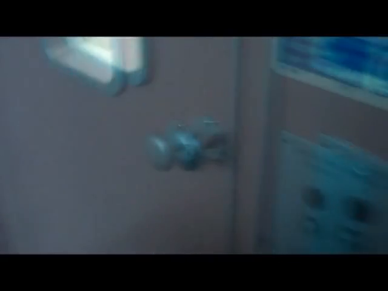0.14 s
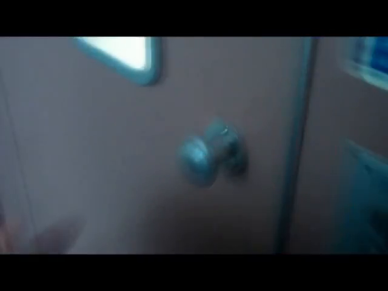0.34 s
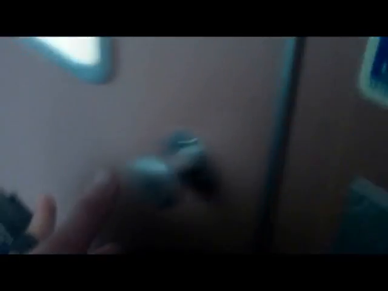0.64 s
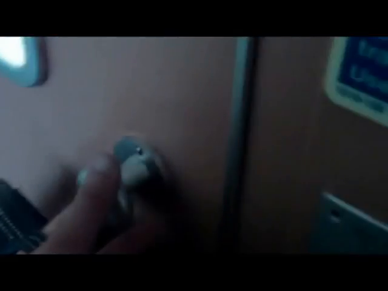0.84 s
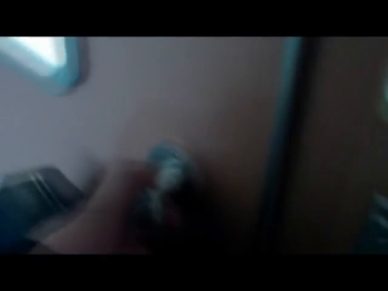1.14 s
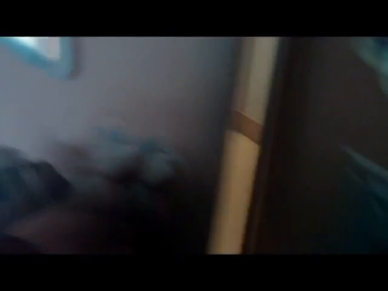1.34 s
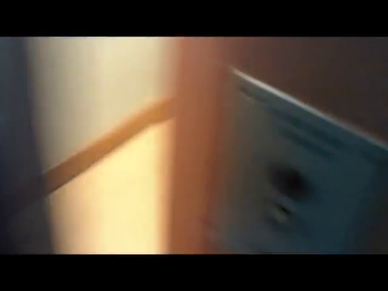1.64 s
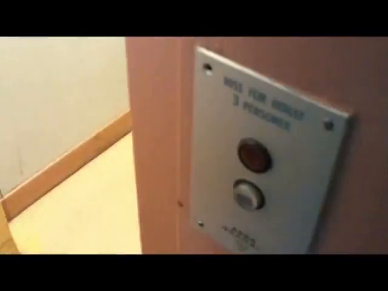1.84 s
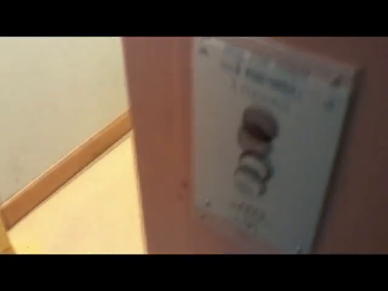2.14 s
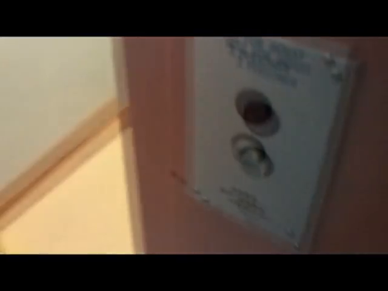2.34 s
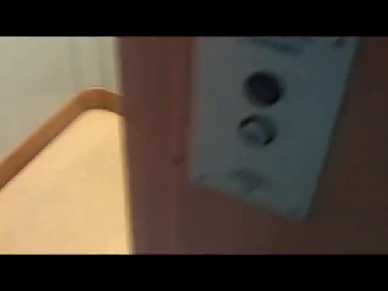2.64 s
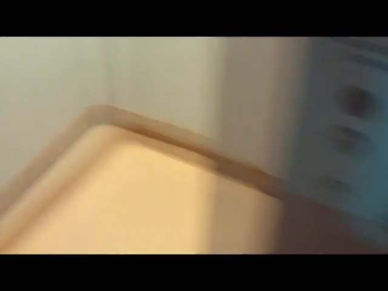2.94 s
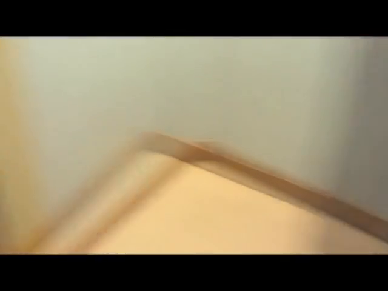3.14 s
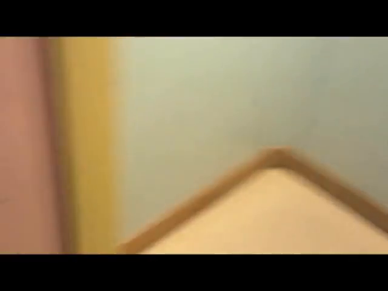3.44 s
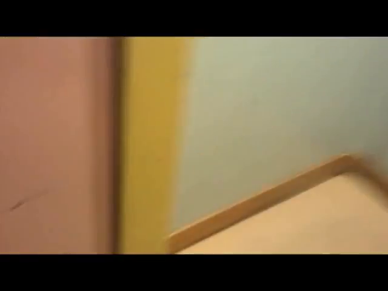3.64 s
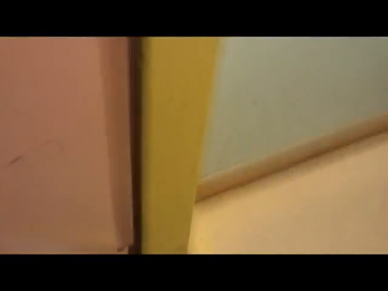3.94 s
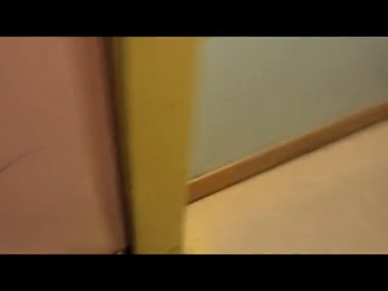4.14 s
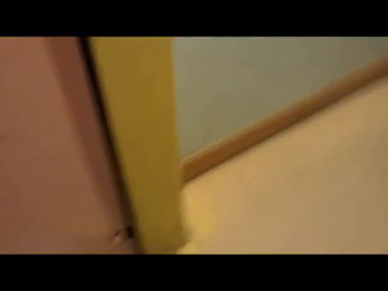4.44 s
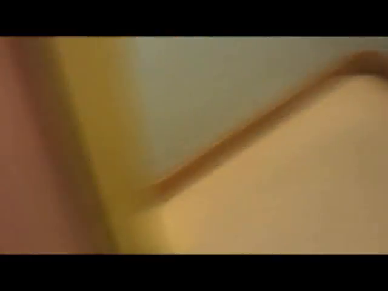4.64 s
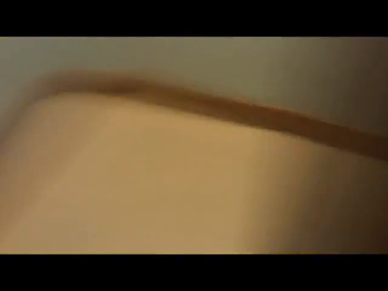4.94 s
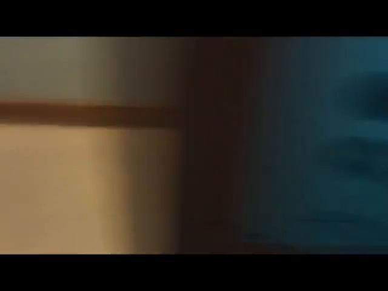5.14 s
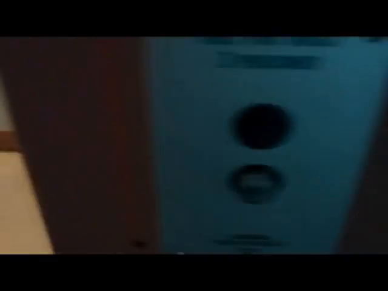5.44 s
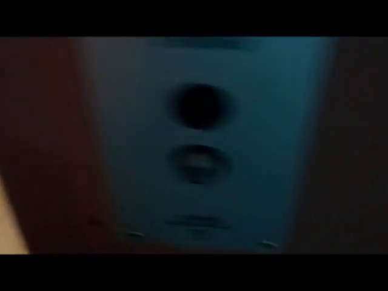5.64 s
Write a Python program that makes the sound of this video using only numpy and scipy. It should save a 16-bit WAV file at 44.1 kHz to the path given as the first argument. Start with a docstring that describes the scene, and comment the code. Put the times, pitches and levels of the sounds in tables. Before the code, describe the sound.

An old lift hums steadily while its steel door is pulled open, then an inner door slides, clanks and bangs shut with a deep boom.

```python
"""An old lift hums on its landing, as overtones of one tone over shaped noise, and a small camera hisses.
The camera's case ticks in the grip: slipping plastic gives noise cracks and very short damped modes.
A hand turns the knob and pulls the steel door open: blows excite rattles, modes and a diffuse echo.
The inner door knocks, rubs, clanks on its catch and bangs against the car, which booms on its ropes.
Loud blows overload the one microphone, which flattens their peaks."""
import sys
import numpy as np
from scipy import signal
from scipy.fft import rfft, irfft
from scipy.io import wavfile

SR = 44100
rng = np.random.default_rng(int(sys.argv[2]) if len(sys.argv) > 2 else 0)


def waveform_to_disk(signal):
    """Save audio, clipped to [-1, 1], as 16-bit WAV at the path in sys.argv[1]."""
    frames = np.transpose(np.atleast_2d(signal))
    scaled = np.clip(frames, -1, 1) * 32767
    samples = np.round(scaled).astype(np.int16)
    wavfile.write(sys.argv[1], SR, samples)


N = 254456
TIME = np.arange(N) / SR
RING_TIME = TIME[:65536]  # span of one blow, about 1.5 s

# Levels are relative: each source's own gain follows. A t60 is the time of a 60 dB decay.
# Blows of the inner door on the car. Each row: start in seconds, level in dB, rattle t60 in seconds.
CAR_BLOWS = [(4.053, -10.5, 0.094), (4.224, -25, 0.11), (4.746, -32.5, 0.15)]


def amp(db):
    """The decibel is logarithmic: 20 dB is a tenfold amplitude."""
    return 10 ** (np.asarray(db) / 20)


def unit(x):
    """Root-mean-square normalisation: equal mean power for every signal."""
    return x / np.sqrt(np.mean(x ** 2) + 1e-20)


def read(points, hz):
    """Interpolation on a logarithmic frequency axis, as pitch is heard."""
    f, value = np.transpose(points)
    return np.interp(np.log(hz + 1), np.log(f + 1), value)


def level(points):
    """A gain envelope whose level moves linearly in decibels between rows of (s, dB)."""
    return amp(np.interp(TIME, *np.transpose(points)))


def fade(t, t60):
    """Exponential decay: linear damping loses 60 dB in every t60."""
    return np.exp(-np.log(1000) * t / np.maximum(t60, 1e-4))


def stroke(t, rise, hold, t60):
    """A driven motion: linear run-up, steady hold, then exponential decay."""
    run_up = np.clip(t / max(rise, 1e-4), 0, 1)
    return run_up * fade(np.maximum(t - rise - hold, 0), t60)


def add(mix, s, sound):
    """Linear superposition of a sound from time s onward."""
    part = mix[max(round(s * SR), 0):][:len(sound)]
    part += sound[:len(part)]


def noise(colour, size):
    """Filtered white noise: a random source of rms 1 with a prescribed spectrum."""
    hz = np.fft.rfftfreq(size, 1 / SR)
    white = rng.standard_normal(size)
    return unit(irfft(rfft(white) * amp(read(colour, hz)), size))


def drift(per_s):
    """Slow random modulation of rms 1, interpolated between chance values."""
    knots = np.arange(0, TIME[-1] + 1, 1 / per_s)
    return unit(np.interp(TIME, knots, rng.standard_normal(len(knots))))


def low_pass(x, edge_hz):
    """Band limiting by convolution with a windowed sinc."""
    taps = signal.firwin(255, edge_hz, window=("kaiser", 9), fs=SR)
    return signal.oaconvolve(x, taps, "same")


def ring(modes, detune, hold=0):
    """Modal superposition: damped sines, slightly retuned each time, decay once the drive lets go."""
    free = np.maximum(RING_TIME - hold, 0)
    total = np.zeros(len(RING_TIME))
    for k, (hz, db, t60) in enumerate(modes):
        shifted_hz = hz * (1 + detune * rng.uniform(-0.82, 1))
        sine = np.sin(2 * np.pi * shifted_hz * RING_TIME)
        total += (-1) ** k * amp(db) * fade(free, t60) * sine  # neighbours start in opposite sign
    return np.sqrt(2) * total


def echo(colour):
    """Diffuse reverberation: each frequency band of a noise decays at the landing's own rate."""
    # The landing. Each row: frequency in Hz, t60 in seconds.
    room_decay = [(40, 3.1), (200, 1.06), (800, 0.85), (2000, 0.57), (7000, 0.62)]
    hz, t, bands = signal.stft(noise(colour, size=len(RING_TIME)), SR, nperseg=1024)
    decaying = bands * fade(t, read(room_decay, hz)[:, None])
    return signal.istft(decaying, SR)[1][:len(RING_TIME)]


def struck(blows, colour, modes, rise_s, ring_db, room_db):
    """Impact excitation: a blow sets off a dense rattle, discrete modes and the landing's echo."""
    out, t = np.zeros(N), RING_TIME
    for s, db, t60 in blows:
        shape = fade(t, t60)
        rattle = unit(noise(colour, size=len(t)) * shape) * np.sqrt(np.mean(shape ** 2))
        ringing = amp(ring_db) * ring(modes, detune=.003)
        sound = rattle + ringing + amp(room_db) * echo(colour)
        attack = np.minimum(t / max(rise_s, 1e-4), 1)
        add(out, s, amp(db) * attack * sound)
    return out


def friction(pushes, colour, slips_per_s, uneven_db):
    """Friction or flow noise: amplitude follows speed, set by the strongest push, with random unevenness."""
    strokes = [amp(db) * stroke(TIME - s, rise, hold, t60) for s, db, rise, hold, t60 in pushes]
    speed = np.max(strokes, axis=0)
    return speed * unit(noise(colour, size=N) * amp(uneven_db * drift(slips_per_s)))


def machine(waver, hum_db, wash_db, swell_db):
    """Harmonic synthesis: a slightly unsteady mains hum and overtones, over noise from the shaft."""
    # Hum changing as the camera moves through its standing waves. Each row: time in seconds, level in dB.
    hum_level = [(0.08, -43), (1.59, -39), (1.71, -44), (3.04, -47.5), (3.29, -39), (3.44, -60), (3.6, -49),
                 (4.4, -40), (4.776, -47.5), (4.982, -67), (5.16, -42), (5.7, -41.5)]
    # Overtones of the hum. Each row: multiple of the lowest tone, level in dB.
    hum_orders = [(1, 1), (2, -23), (3, -25.5), (4, -30.5)]
    # Machine noise in the shaft. Each row: frequency in Hz, density in dB per Hz.
    shaft_colour = [(20, -16.5), (50, -3.5), (85, -7.5), (125, -2), (170, -7), (290, -4.5), (370, -10.5),
                    (600, -12), (950, -11.5), (1300, -18.5), (2500, -25), (6000, -29.5)]
    # The wash swells as the outer door opens. Each row: time in seconds, level in dB.
    shaft_level = [(0.05, -39.5), (0.82, -42), (1.34, -35), (2.4, -41.5), (2.7, -42), (5.1, -40),
                   (5.7, -41.5)]
    turns = 120.8 * TIME + waver * drift(5)  # cycles of a tone centred on 120.8 Hz
    hum = np.sqrt(2) * sum(amp(db) * np.cos(2 * np.pi * round(k) * turns) for k, db in hum_orders)
    wash = noise(shaft_colour, size=N) * amp(swell_db * drift(14))
    return amp(hum_db) * hum * level(hum_level) + amp(wash_db) * wash * level(shaft_level)


def microphone_hiss(gain_db):
    """Stationary coloured noise under a slowly varying gain."""
    # Each row: frequency in Hz, density in dB per Hz.
    hiss_colour = [(100, -7.5), (1500, 1.5), (3500, -0.5), (6000, 0.5), (7200, -7)]
    # Each row: time in seconds, level in dB.
    hiss_level = [(0.0, -42), (2.76, -43), (4.06, -42), (5.05, -45.5), (5.77, -45)]
    return amp(gain_db) * level(hiss_level) * noise(hiss_colour, size=N)


def draught():
    """Flow noise: the outer door drags air past the microphone in a low rumble."""
    # Each row: start in seconds, level in dB, run-up in seconds, hold in seconds, coasting t60 in seconds.
    draught_pushes = [(1.1, -41, .2, 0.34, 2.8)]
    # Each row: frequency in Hz, density in dB per Hz.
    draught_colour = [(25, -3), (50, 0), (90, -9), (300, -15), (600, -35), (7000, -60)]
    return friction(draught_pushes, draught_colour, slips_per_s=15, uneven_db=2.5)


def scuffs(skirt_db):
    """Soft friction of sleeve and hand: bands of noise that swell and fade."""
    # Each row: middle in seconds, level in dB, length in seconds, centre frequency in Hz.
    scuff_rows = [(0.135, -31.5, .025, 1460), (1.689, -33.5, 0.15, 735), (2.065, -39, 0.035, 1570),
                  (2.43, -37.5, 0.064, 550), (2.954, -43, 0.29, 1900), (4.718, -25, .008, 706),
                  (4.74, -28.5, .03, 2270), (4.848, -38, 0.092, 2260), (5.353, -40.5, 0.075, 1800)]
    out = np.zeros(N)
    for s, db, length, hz in scuff_rows:
        swell = signal.windows.hann(round(length * SR))
        colour = [(hz / 8, 2 * skirt_db), (hz, 0), (hz * 8, 2 * skirt_db)]
        add(out, s - length / 2, amp(db) * swell * noise(colour, size=len(swell)))
    return out


def case_ticks():
    """Stick-slip near the microphone: a dry crack, a hollow knock and shell modes, brighter if harder."""
    # Each row: start in seconds, level in dB, slipping time in seconds,
    # hardness in dB per octave, hollow knock in dB.
    ticks = [(.149, -15, 0.0058, 1.5, -16), (.2, -31.5, 0.00041, -18, -14), (1.54, -28.5, 0.0027, -17, -13),
             (2.15, -19.5, 0.00062, 4, -2), (2.1754, -14, 0.0041, 5.5, -6.5),
             (2.2163, -24.5, 0.00031, -13, -12), (4.507, -21.5, 0.00034, 1, -21),
             (4.595, -8, 0.00045, 2.5, -14.5), (4.722, -9.5, .0005, 4, -13),
             (4.9185, -10, .0005, -3, -12.5)]
    # Shell of the case. Each row: frequency in Hz, level in dB, t60 in seconds.
    case_modes = [(1045, -5.5, 0.024), (1417, -18, 0.074), (1886, -6.5, 0.016), (2361, -8, 0.016),
                  (2996, -10, 0.014), (4202, -19, 0.014)]
    # Hollow of the case. Each row: frequency in Hz, level in dB, t60 in seconds.
    hollow_modes = [(394, -1, .028), (597, 0, 0.02)]
    # Dry crack. Each row: frequency in Hz, density in dB per Hz.
    crack_colour = [(100, -21), (600, 5.5), (1100, 11.5), (2500, 7.5), (3500, -3.5), (4800, 0.5),
                    (6000, 6.5), (7200, -15.5)]
    out, t = np.zeros(N), RING_TIME
    for s, db, slip_s, hardness, knock_db in ticks:
        crack_gain = amp(1.5 + .2 * hardness)  # a harder slip cracks louder
        slipping = stroke(t, 0, slip_s, t60=0.015)
        crack = crack_gain * noise(crack_colour, size=len(t)) * slipping
        knock = amp(knock_db) * ring(hollow_modes, detune=0.041)
        # hardness tilts the shell's spectrum about 1400 Hz
        shell = [(hz, mode_db + hardness * np.log2(hz / 1400), t60) for hz, mode_db, t60 in case_modes]
        add(out, s, amp(db) * (ring(shell, detune=0.063, hold=slip_s) + crack + knock))
    return out


def rubbing_doors():
    """Sliding friction: each push speeds a door up, then it coasts and its rubbing dies away."""
    # Each row: start in seconds, level in dB, run-up in seconds, hold in seconds, coasting t60 in seconds.
    door_pushes = [(1.13, -29.5, 0.068, .01, 0.58), (1.27, -33, 0.038, .02, 1.14),
                   (2.8, -38, .2, 0.11, 3.5), (3.3, -32.5, 0.028, 0.021, 3.1), (3.85, -34, .1, 0.18, 3.8),
                   (4.44, -33, 0.086, 0.049, .6)]
    # Each row: frequency in Hz, density in dB per Hz.
    rub_colour = [(30, -1), (90, -1.5), (300, 1), (450, -4.5), (800, 1), (1300, -4), (2200, -9.5),
                  (3200, -12), (7000, -16.5)]
    return friction(door_pushes, rub_colour, slips_per_s=120, uneven_db=2.0)


def sliding_door():
    """Sliding friction: the inner door runs fast on its track just before it bangs."""
    # Each row: start in seconds, level in dB, run-up in seconds, hold in seconds, coasting t60 in seconds.
    slide_pushes = [(3.96, -23.5, 0.026, 0.066, 0.78)]
    # Each row: frequency in Hz, density in dB per Hz.
    slide_colour = [(100, -18), (300, -5.5), (500, -3), (750, -3), (1000, -4), (1300, -15), (1900, -22),
                    (2600, -32), (7000, -45)]
    return friction(slide_pushes, slide_colour, slips_per_s=290, uneven_db=0.9)


def catch_scrape():
    """Friction of steel on steel at the catch: noise in narrow treble bands."""
    # Each row: start in seconds, level in dB, run-up in seconds, hold in seconds, coasting t60 in seconds.
    scrape_pushes = [(3.782, -21.5, 0.027, 0.0044, 0.13)]
    # Each row: frequency in Hz, density in dB per Hz.
    scrape_colour = [(2500, -39), (4500, -18), (5050, 3.5), (5250, -17), (5500, 4), (5800, 2), (6090, -15),
                     (7000, -7.5)]
    return friction(scrape_pushes, scrape_colour, slips_per_s=200, uneven_db=-1.0)


def catch_pings():
    """Free vibration of small steel: the catch rings brightly for a moment."""
    # Each row: start in seconds, level in dB.
    ping_rows = [(3.564, -30.5), (3.783, -33)]
    # Each row: frequency in Hz, level in dB, t60 in seconds.
    ping_modes = [(560, -1.5, 0.097), (1700, -11, 0.11), (3040, -4, 0.12), (3120, -4.5, 0.1),
                  (4770, -5.5, 0.081), (6120, -9.5, .08)]
    out = np.zeros(N)
    for s, db in ping_rows:
        add(out, s, amp(db) * ring(ping_modes, detune=0.0026))
    return out


def outer_door():
    """Impact on a steel door: a dense rattle with a few longer modes."""
    # Each row: start in seconds, level in dB, rattle t60 in seconds.
    door_blows = [(.847, -19, 0.1), (.908, -30, .1), (1.336, -30, 0.17)]
    # Each row: frequency in Hz, density in dB per Hz.
    door_colour = [(25, 1.5), (80, -12), (140, 6.5), (260, -7), (450, -8), (760, -6.5), (1100, -9.5),
                   (1500, -14), (2500, -24), (7000, -31)]
    # Each row: frequency in Hz, level in dB, t60 in seconds.
    door_modes = [(146, -12, 0.33), (394, -19, 0.38), (766, -6, 0.11), (1335, -22, 0.67)]
    return struck(door_blows, door_colour, door_modes, rise_s=0.0024, ring_db=-3.0, room_db=-12.5)


def latch():
    """Impact on a small stiff part: a sharp attack excites more treble."""
    # Each row: start in seconds, level in dB, rattle t60 in seconds.
    latch_blows = [(1.13, -33, 0.088), (1.191, -15, 0.077), (1.334, -30, 0.065), (1.402, -30, .055)]
    # Each row: frequency in Hz, density in dB per Hz.
    latch_colour = [(30, -9), (90, -5.5), (200, -11), (450, -6), (800, 2), (1200, -12), (2500, -8),
                    (3500, -15.5), (7000, -17)]
    # Each row: frequency in Hz, level in dB, t60 in seconds.
    latch_modes = [(213.4, -16.5, 0.36), (804, -12, 0.23), (1420, -10.5, 0.18), (2530, -12, 0.11)]
    return struck(latch_blows, latch_colour, latch_modes, rise_s=0.0011, ring_db=-1, room_db=-13.5)


def inner_panel():
    """Impact on a panel: the inner door's knock excites its modes."""
    # Each row: start in seconds, level in dB, rattle t60 in seconds.
    panel_blows = [(3.33, -31.5, .12), (3.347, -18, 0.17)]
    # Each row: frequency in Hz, density in dB per Hz.
    panel_colour = [(30, -19), (120, -6.5), (220, -8.5), (300, -2.5), (400, 3), (490, -4), (730, 5),
                    (950, -10), (1300, -12), (2000, -23), (7000, -26)]
    # Each row: frequency in Hz, level in dB, t60 in seconds.
    panel_modes = [(205, -8, 0.36), (370, -28, .3), (398, -5.5, 0.44), (717, -15, 0.17), (1148, -12, 0.22),
                   (1375, -22, 0.7)]
    return struck(panel_blows, panel_colour, panel_modes, rise_s=0.0022, ring_db=-1, room_db=-8.0)


def catch():
    """Impact of the inner door on its catch: a clank with modes from bass to treble."""
    # Each row: start in seconds, level in dB, rattle t60 in seconds.
    catch_blows = [(3.783, -19, 0.14), (3.803, -21, 0.23)]
    # Each row: frequency in Hz, density in dB per Hz.
    catch_colour = [(30, -21), (80, 6), (220, -0.5), (330, 7.5), (450, -5.5), (750, -1), (1150, -2),
                    (1400, -19), (1900, -7), (2500, -16), (4000, -11.5), (5500, -16), (7000, -15)]
    # Each row: frequency in Hz, level in dB, t60 in seconds.
    catch_modes = [(187, -13, 1), (311, 2.5, 0.2), (555, -8, 0.2), (1860, -12, .45), (1960, -23, .35),
                   (5100, -18, .22), (5800, -22, 0.14), (6060, -15, .2)]
    return struck(catch_blows, catch_colour, catch_modes, rise_s=0.0036, ring_db=-7.0, room_db=-7)


def frame():
    """Repeated impact: the door rebounds on its frame after the bang."""
    # Each row: start in seconds, level in dB, rattle t60 in seconds.
    frame_blows = [(4.054, -18.5, .04), (4.103, -12.5, 0.043)]
    # Each row: frequency in Hz, density in dB per Hz.
    frame_colour = [(150, -5), (600, 1.5), (1000, 4.5), (1600, -12), (2500, -20.5), (5500, -13),
                    (7000, -16)]
    # Each row: frequency in Hz, level in dB, t60 in seconds.
    frame_modes = [(948, -10.5, 0.47), (1026, -19, 0.23)]
    return struck(frame_blows, frame_colour, frame_modes, rise_s=0.0014, ring_db=-4.5, room_db=-15.5)


def sway(build_s):
    """Inertia: the heavy car on its ropes takes up the bang slowly and rocks on in low modes."""
    # Each row: frequency in Hz, level in dB, t60 in seconds.
    sway_modes = [(40.4, -15.5, 0.72), (35.2, -25, 2.9), (26.1, -28, 1.2)]
    out = np.zeros(N)
    build_up = 1 - np.exp(-(RING_TIME / build_s) ** 2)
    add(out, CAR_BLOWS[0][0], ring(sway_modes, detune=.002) * build_up)
    return out


def car():
    """Impact on a large hollow body: the bang excites low, long modes."""
    # Each row: frequency in Hz, density in dB per Hz.
    car_colour = [(25, -30), (60, -7.5), (120, -8.5), (190, 7), (270, 6.5), (350, -6), (700, -10.5),
                  (1000, -8.5), (1300, -18.5), (1800, -15), (2500, -30), (6000, -30.5)]
    # Each row: frequency in Hz, level in dB, t60 in seconds.
    car_modes = [(79.7, -18.5, 0.91), (134.4, -17, 1), (176, -16.5, 1.78), (225, -9, 0.5), (263, -17, 0.75)]
    return struck(CAR_BLOWS, car_colour, car_modes, rise_s=.002, ring_db=0.5, room_db=-4)


def scene():
    """Superposition: the pressures of all sources add at one microphone."""
    background = machine(waver=0.019, hum_db=-1, wash_db=1.0, swell_db=1.34) + microphone_hiss(gain_db=3.5)
    handling = scuffs(skirt_db=-12.5) + case_ticks()
    moving = draught() + rubbing_doors() + sliding_door() + catch_scrape()
    outer = outer_door() + latch()
    inner = catch_pings() + inner_panel() + catch()
    bang = frame() + sway(build_s=0.06) + car()
    mono = background + handling + moving + outer + inner + bang
    return np.array([mono, mono])


def record(dry):
    """Saturation: a narrow-band microphone flattens loud peaks, which adds brief treble."""
    mic_edge_hz, droop_hz, edge_hz = 7150, 13600, 15700
    ceiling, knee = .24, 5  # amplitude limit, and how sharply it is reached
    narrow = low_pass(dry.mean(0), mic_edge_hz)
    clipped = narrow / (1 + abs(narrow / ceiling) ** knee) ** (1 / knee)
    hz = np.fft.rfftfreq(N, 1 / SR)
    softened = irfft(rfft(clipped) / np.sqrt(1 + (hz / droop_hz) ** 10), N)  # the top treble falls away
    return np.tile(low_pass(softened, edge_hz), (2, 1))


dry = scene()
out = record(dry)
waveform_to_disk(out)
```